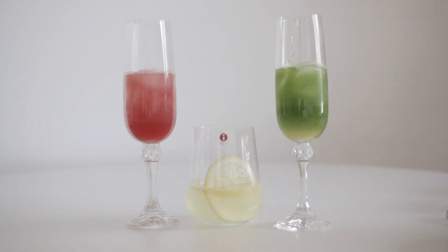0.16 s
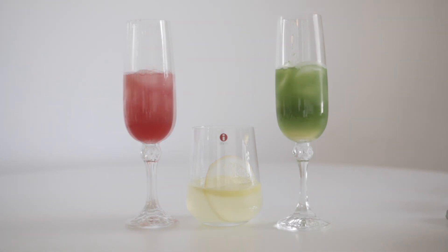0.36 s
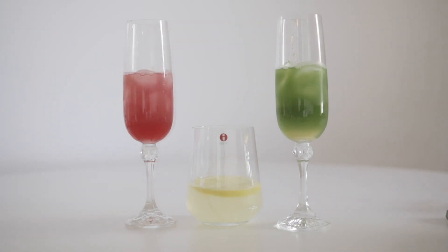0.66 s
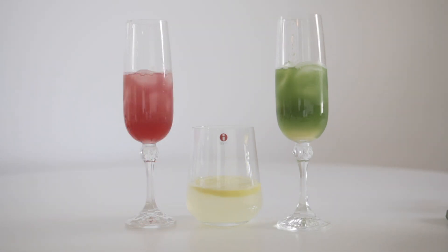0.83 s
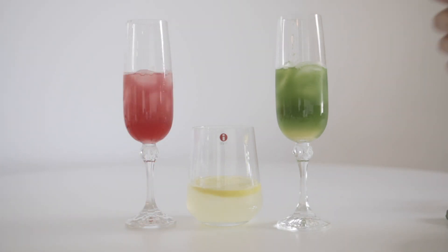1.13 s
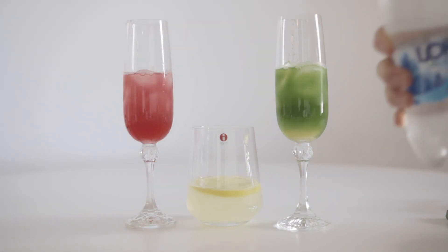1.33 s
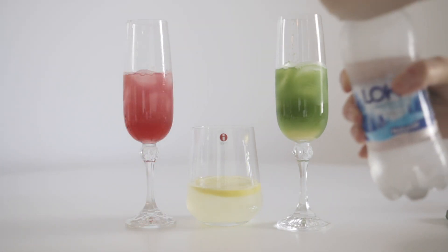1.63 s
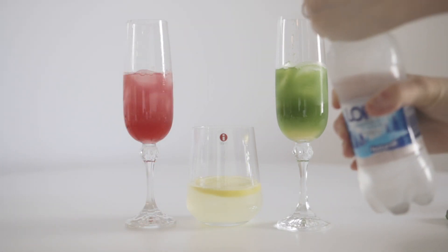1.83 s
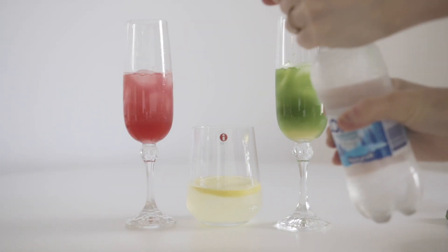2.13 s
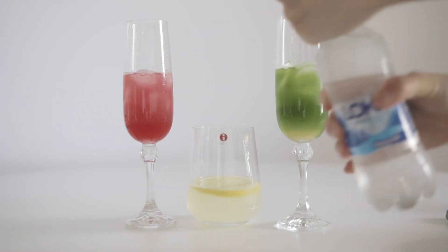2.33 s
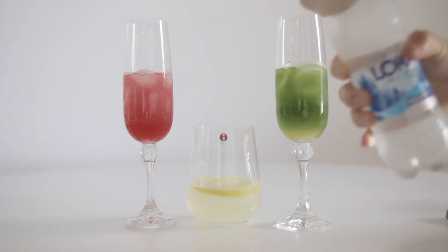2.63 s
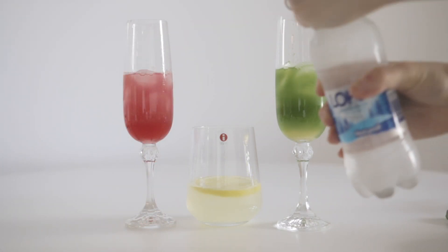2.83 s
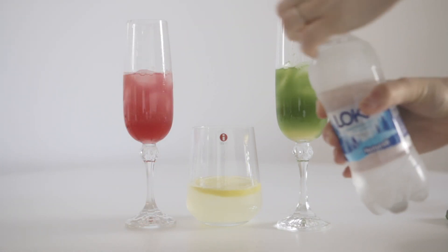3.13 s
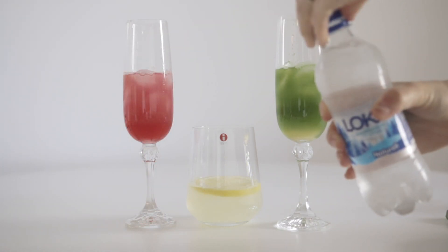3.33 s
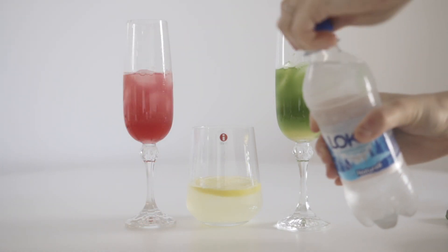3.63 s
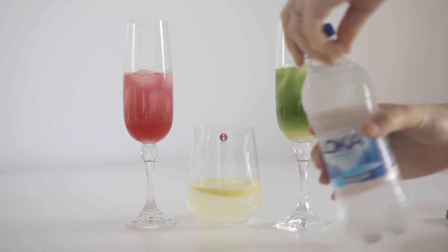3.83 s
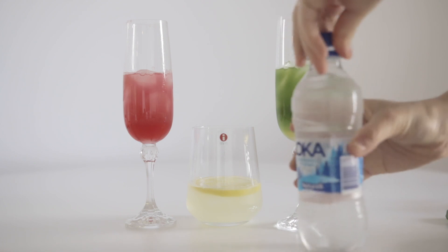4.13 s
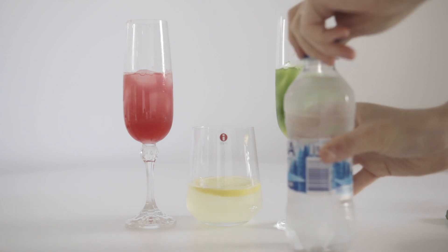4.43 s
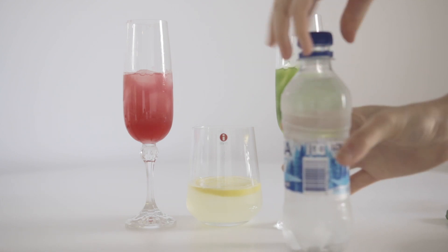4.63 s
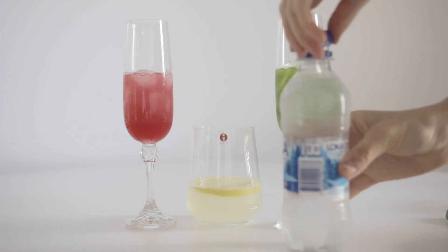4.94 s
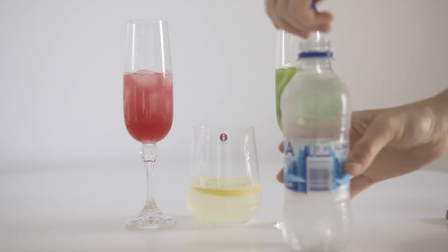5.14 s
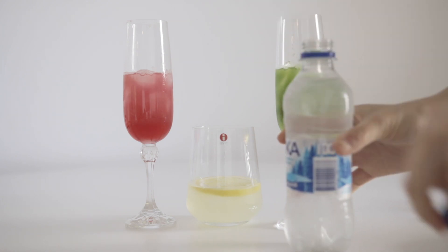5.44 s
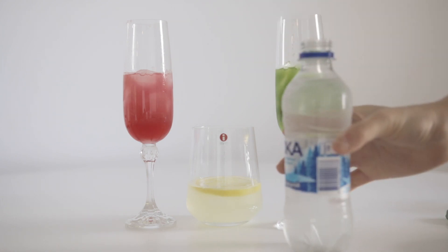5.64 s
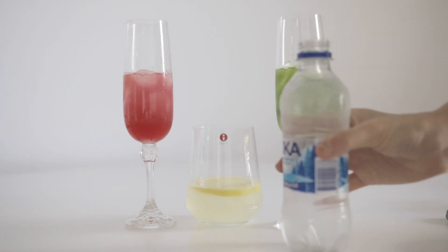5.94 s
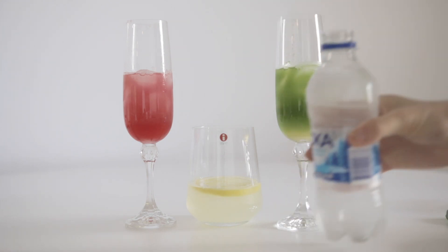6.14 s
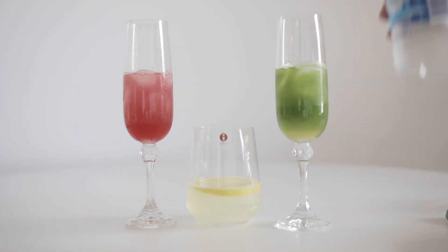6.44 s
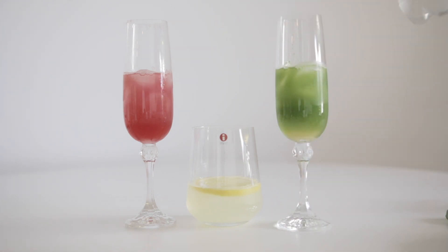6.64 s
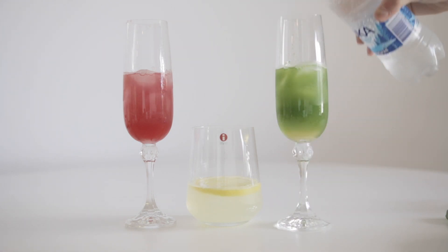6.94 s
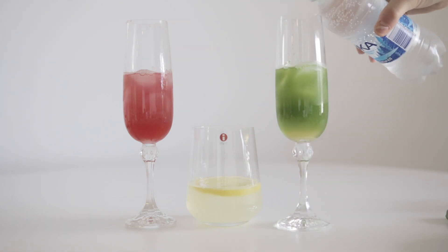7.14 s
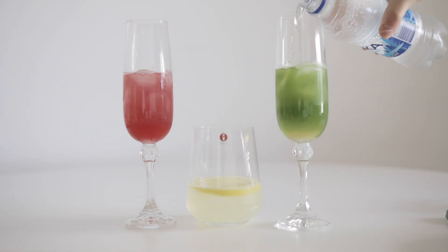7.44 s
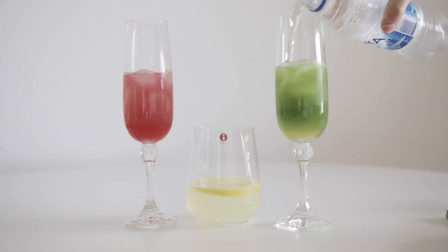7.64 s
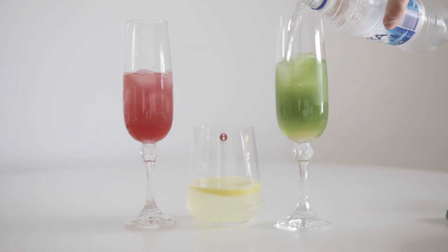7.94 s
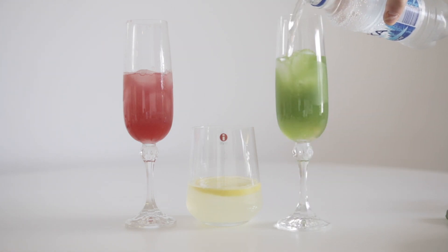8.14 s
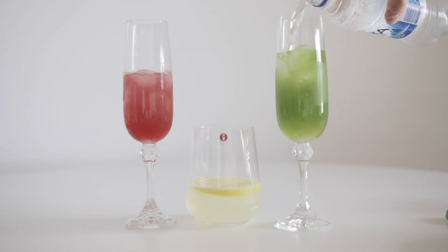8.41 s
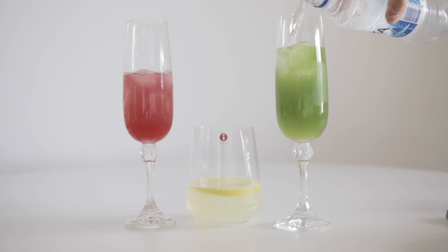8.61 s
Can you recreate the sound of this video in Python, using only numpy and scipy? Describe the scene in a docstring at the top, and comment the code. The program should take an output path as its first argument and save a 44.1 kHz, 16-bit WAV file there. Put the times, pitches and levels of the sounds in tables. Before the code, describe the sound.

In a quiet room, a faint glass tap is followed by soft rubbing and ticks of fingers on a plastic bottle. The cap cracks with a brief wisp of gas and small sloshes. The bottle lands on a table with a low thud, the cap snaps loudly and clicks loose, then drops and rattles to rest. Finally, fizzy water pours softly over clinking ice in a glass. Everything sounds close.

```python
"""A plastic bottle of fizzy water is handled in a quiet room and its cap cracked open: snaps ring cap and
hollow wall, the thread grinds, gas sings in the neck. Set down, the bottle makes the table boom in its
low modes; the dropped cap rattles to rest. Water is poured over ice in a tall glass: ice rings the glass,
bubbles excite a rising air column, fizz spits. At the start a lemon slice tips over in a tumbler."""
import sys
import numpy as np
from scipy import signal
from scipy.io import wavfile
from scipy.ndimage import uniform_filter1d

SR = 44100
rng = np.random.default_rng(int(sys.argv[2]) if len(sys.argv) > 2 else 0)


def digitize_waveform(pressure):
    """Quantize a signal to 16-bit integers and store it at the path in sys.argv[1].

    Rows of a 2-D input are taken as channels; values are limited to [-1, 1].
    """
    field = np.atleast_2d(pressure).T
    bounded = np.clip(field, -1, 1)
    quanta = np.round(bounded * 32767).astype(np.int16)
    wavfile.write(sys.argv[1], SR, quanta)


N = 386757

# Noise spectra. Each row: frequency in Hz, relative density in dB.
ROOM_SPECTRUM = [(25, -9.5), (91, -6), (462, -6.5), (2200, -20.5), (8000, -28), (15900, -33)]
RUB_SPECTRUM = [(1300, -16), (2600, -10.5), (4500, -11), (7000, -28), (16000, -35)]
# Stereo likeness of noise. Each row: frequency in Hz, left-right correlation.
COHERENCE = [(60, 0.081), (380, 0.27), (2380, 0.64), (15000, 0.037)]
# Hum band. Values: centre in Hz, width in Hz, level in dB at the start, level in dB from 1 s on.
HUM_BAND = (312, 53, -64, -65.5)
# Skin and sleeve strokes. Each row: start and end in seconds, level in dB, relative hiss in dB.
RUB_STROKES = [(0.355, 0.638, -63, -6), (1.161, 1.388, -61.5, -3.5), (1.454, 1.783, -62, 0),
               (1.629, 1.93, -56, 4.5), (3.827, 3.996, -59.5, 7)]
# Sudden slips. Each row: start in seconds, level in dB, t60 in seconds, resonance in Hz.
SLIP_STROKES = [(0.614, -43.5, 1, 2500), (2.363, -46.5, 0.79, 2620), (2.873, -35.5, 0.18, 4460),
                (4.385, -30, 0.32, 3200)]
# Contacts. Each row: start in seconds, peak in dB.
LEMON_TAPS = [(0.613, -34.5), (0.62, -37), (0.638, -37)]
FINGER_TICKS = [(1.917, -27), (2.029, -39), (2.124, -30.5), (2.2097, -37), (2.313, -44.5), (2.5282, -30),
                (3.8385, -27.5), (3.885, -36), (3.895, -20.5), (3.92, -26), (3.944, -32), (3.9936, -29.5),
                (4.937, -32), (5.466, -36.5), (4.818, -29), (4.835, -28), (4.865, -35)]
BOTTLE_LANDINGS = [(4.032, -18.5), (4.0834, -29.5), (4.177, -44)]
# Struck bodies. Each row: frequency in Hz, relative level in dB, t60 in seconds.
TUMBLER_MODES = [(2610, -1, 0.052), (3530, 1, 0.029), (4150, 11, 0.038)]
TIGHT_CAP_MODES = [(1880, -15.5, 0.0036), (2620, -1.5, 0.0038), (3150, 0, 0.0049), (3960, 7, 0.0019)]
BOTTLE_WALL_MODES = [(540, 2, 0.041), (793, 9.5, 0.027), (984, 3, 0.023)]
BOTTLE_BASE_MODES = [(455, 4.5, 0.041), (1390, -12.5, 0.023), (2350, -15, 0.011)]
LOOSE_CAP_MODES = [(3590, -13.5, 0.0038), (4700, -4.5, 0.0028), (6190, -9.5, 0.0041)]
TABLE_TOP_MODES = [(647, -18, 0.012), (1150, -6, 0.006), (1600, -3, 0.005), (2350, 2, 0.004)]
GLASS_MODES = [(1363, -11.5, 0.042), (2520, 8.5, 0.003), (3540, 1.5, 0.016), (4350, 4, 0.0087)]
# Liquid pulses. Each row: start in seconds, level in dB, pitch in Hz.
LIQUID_PLOPS = [(0.673, -43.5, 350), (2.39, -34, 520), (2.86, -28, 535), (3.179, -39.5, 590),
                (3.2405, -30.5, 587), (3.806, -34.5, 603), (3.852, -30, 511), (7.643, -30.5, 524)]
WATER_GULPS = [(7.654, -33.5, 1430), (8.0506, -35, 4100), (8.217, -28.5, 1920), (8.4465, -42.5, 1440),
               (8.582, -40.5, 1920)]
# Cap and wall snaps. Each row: start in seconds, cap peak in dB, relative tick peak in dB.
BOTTLE_SNAPS = [(1.859, -35, 3), (2.375, -45, 5), (2.829, -36.5, 1), (2.842, -26.5, 8.5),
                (2.8499, -16, -11), (2.8573, -7.5, -2.5), (3.0765, -25, 7), (3.098, -22, 8.5),
                (3.54, -41, -5), (3.61, -44, 3), (3.8507, -32, -12), (3.9403, -24, 11), (4.268, -39, -1),
                (4.374, -1, 1.5), (4.377, -11.5, -9), (4.6571, -36, 7), (4.784, -11.5, -13),
                (4.83, -22, -14), (4.846, -26, -3), (4.9467, -26, -7), (4.987, -24, 7.5),
                (5.111, -25, -7.5), (5.3345, -37.5, 0)]
# Escaping gas. Values: start in seconds, level in dB, centre in Hz, width in Hz, t60 in seconds.
GAS_BURST = (2.862, -41, 2320, 130, .5)
# Turns of the cap. Each row: start and end in seconds, level in dB.
CAP_TWISTS = [(3.17, 3.211, -60), (3.5, 3.83, -65), (4.26, 4.367, -61.5)]
# Pushes on the table. Each row: start in seconds, rocking gain in dB, bending gain in dB.
TABLE_PUSHES = [(4.033, -15.5, -20.5), (4.363, -18, -29), (4.838, -24.5, -24), (5.218, -41, -32.5),
                (5.329, -39, -48), (5.631, -49, -35.5), (5.743, -40.5, -51.5), (6.102, -37.5, -48),
                (7.607, -51, -70)]
# Low table modes. Each row: frequency in Hz, relative level in dB, t60 in seconds, right lag in cycles.
ROCKING_MODES = [(72.8, 0, 0.74, 0.09), (84.3, 3, 0.54, 0.089)]
BENDING_MODES = [(38.2, -7, 1, 0.4), (117.7, 10, 0.24, 0.16), (131.5, -6, 1, 0.18),
                 (193.8, -5.5, 0.59, 0.17)]
# Cap bounces. Each row: start in seconds, cap peak in dB, flatness from 0 (rim) to 1 (flat).
CAP_BOUNCES = [(5.695, -40.5, 0.71), (5.7214, -3, 0.034), (5.727, -19, 0.45), (5.747, -21.5, 0.78),
               (5.7602, -4, 0.03), (5.778, -11.5, 0.039), (5.791, -11.5, .02), (5.8, -26.5, 0.91),
               (5.8146, -4, 0.063), (5.8292, -13, 0.12), (5.8357, -20.5, 0.57), (5.855, -26.5, 0.6)]
# Ice on glass. Each row: start in seconds, ring peak in dB, mode tilt in dB per octave.
ICE_KNOCKS = [(7.601, -39, 7), (7.6176, -24, 34), (7.6714, -23.5, -3), (7.6988, -28.5, 2),
              (7.8337, -30.5, -20.5), (7.871, -27, -22.5), (8.2018, -34, -7.5)]
# Stream envelope. Each row: time in seconds, gain in dB.
STREAM_FLOW = [(7.612, -50.5), (7.78, -58.5), (7.86, -51.5), (7.96, -58), (8.77, -61)]
# Room decay before treble absorption. Each row: frequency in Hz, t60 in seconds.
ROOM_DECAY = [(250, 0.98), (700, 0.6), (2000, 0.57), (11000, 0.44)]


def gain(db):
    return 10 ** (np.asarray(db) / 20)


def decay(t, t60_s, db=0):
    return gain(db - 60 * t / t60_s)


def unit_rms(x):
    return x / np.sqrt(np.mean(x ** 2) + 1e-20)


def log_interp(points, hz):
    knots_hz, values = np.transpose(points)
    return np.interp(np.log(hz + 1), np.log(knots_hz + 1), values)


def highpass(x, hz):
    return signal.sosfilt(signal.butter(4, hz, "high", fs=SR, output="sos"), x)


def add(mix, start_s, sound, left_db=0):
    """Mix in, panned; channels up to one sample apart."""
    for channel, side, lag in zip(mix, (1, -1), rng.integers(0, 2, 2)):
        part = channel[round(start_s * SR) + lag:][:len(sound)]
        part += sound[:len(part)] * gain(side * left_db / 2)


def ring(modes):
    """Damped sines, peak 1."""
    t = np.arange(4000) / SR
    x = sum(decay(t, t60_s, db) * np.sin(2 * np.pi * hz * t) for hz, db, t60_s in modes)
    return x / abs(x).max()


def detuned(modes):
    """The grip changes per blow and shifts each mode."""
    return [(hz * rng.uniform(.96, 1.04), db + rng.uniform(-3, 3), t60_s) for hz, db, t60_s in modes]


def tick(cutoff_hz):
    """Bare treble of a hard contact."""
    return highpass(np.arange(4000) == 0, cutoff_hz)


def struck(parts, tail_ms):
    """An impulse with a rough tail drives each (response, peak dB) part."""
    t = np.arange(1500) / SR
    contact = (t == 0) + .22 * rng.standard_normal(len(t)) * np.exp(-1000 * t / tail_ms)
    sounds = [(signal.fftconvolve(contact, response)[:4000], db) for response, db in parts]
    return sum(gain(db) * x / abs(x).max() for x, db in sounds)


def band_noise(count, hz, width_hz):
    return unit_rms(signal.lfilter(*signal.iirpeak(hz, hz / width_hz, SR), rng.standard_normal(count)))


def stereo_noise(field_db):
    """Partly coherent noise, rms 1, shaped by a bins x frames field."""
    bins, frames = field_db.shape
    a, b, c, d = rng.standard_normal((frames, bins, 4)).T
    coherence = log_interp(COHERENCE, np.linspace(0, SR / 2, bins))[:, None]
    left = a + 1j * b
    right = coherence * left + np.sqrt(1 - coherence ** 2) * (c + 1j * d)
    size = 2 * bins - 1
    _, x = signal.istft(np.array([left, right]) * gain(field_db), nperseg=size, noverlap=size * 3 // 4)
    return unit_rms(x[:, :N])


def room_air(level_db=-57.5):
    """Steady hush with faint drifting patches."""
    patches = rng.standard_normal((N // 512 + 5, 1025)).T
    drift_db = 1.1 * unit_rms(uniform_filter1d(uniform_filter1d(patches, 10, 0), 12, 1))
    spectrum_db = log_interp(ROOM_SPECTRUM, np.fft.rfftfreq(2048, 1 / SR))
    return gain(level_db) * stereo_noise(spectrum_db[:, None] + drift_db)


def hum():
    """Faint wavering hum: noise in one low resonance."""
    hz, width_hz, first_db, later_db = HUM_BAND
    return band_noise(N, hz, width_hz) * gain(np.interp(np.arange(N) / SR, [0, 1], [first_db, later_db]))


def friction(count, hollow_hz, hiss_db):
    """Grainy noise with a hollow resonance and hiss on top."""
    hz = np.fft.rfftfreq(256, 1 / SR)[:, None]
    grain_db = 1.9 * unit_rms(uniform_filter1d(rng.exponential(1, SR // 100), 3) - 1)
    colour_db = log_interp(RUB_SPECTRUM, hz) + 7 * np.exp(-((hz / hollow_hz - 1) / .1) ** 2)
    hiss = unit_rms(highpass(stereo_noise(np.zeros_like(hz) + grain_db), 6000))
    return (stereo_noise(colour_db + grain_db) + gain(hiss_db) * hiss)[:, :count]


def rubs(swell_share=.31, ease_share=.16, hollow_hz=4100):
    """Skin and sleeves rub: swell, hold, ease off."""
    out = np.zeros((2, N))
    for start_s, end_s, db, hiss_db in RUB_STROKES:
        count = round((end_s - start_s) * SR)
        progress = np.arange(count) / SR / (end_s - start_s)
        envelope = np.minimum(progress / swell_share, 1) * np.minimum((1 - progress) / ease_share, 1)
        sound = gain(db) * envelope * friction(count, hollow_hz, hiss_db)
        out[:, round(start_s * SR):][:, :count] += sound
    return out


def lemon_taps():
    """The tipping slice rings the half-full tumbler."""
    out = np.zeros((2, N))
    for start_s, db in LEMON_TAPS:
        add(out, start_s, struck([(ring(detuned(TUMBLER_MODES)), db)], tail_ms=.68))
    return out


def slips(rise_s=.015):
    """Lemon slips down the tumbler, cap on its thread: sudden, fading friction."""
    out, t = np.zeros((2, N)), np.arange(SR // 2) / SR
    for start_s, db, t60_s, hollow_hz in SLIP_STROKES:
        envelope = np.minimum(t / rise_s, 1) * decay(t, t60_s, db)
        out[:, round(start_s * SR):][:, :len(t)] += envelope * friction(len(t), hollow_hz, hiss_db=-7)
    return out


def plops(rise_s=.0006, t60_s=.032):
    """Liquid plops in tumbler and tilted bottle: short damped sines."""
    out, t = np.zeros((2, N)), np.arange(2000) / SR
    for start_s, db, hz in LIQUID_PLOPS:
        envelope = (1 - np.exp(-t / rise_s)) * decay(t, t60_s, db)
        add(out, start_s, envelope * np.sin(2 * np.pi * hz * t), left_db=.6)
    return out


def snaps(upright_s=3.93, held_db=-23, free_db=-8.5):
    """Snaps tick and ring cap and hollow wall; hands damp the wall until the bottle is upright."""
    out = np.zeros((2, N))
    for start_s, db, tick_db in BOTTLE_SNAPS:
        wall_db, tick_hz = (free_db, 7000) if start_s > upright_s else (held_db, 4000)
        cap = highpass(ring(detuned(TIGHT_CAP_MODES)), 900)
        wall = highpass(ring(detuned(BOTTLE_WALL_MODES)), 400)
        body = struck([(cap, db), (wall, db + wall_db)], tail_ms=.12)
        crack = struck([(tick(tick_hz), db + tick_db)], tail_ms=1.56)
        add(out, start_s, body + crack, left_db=.6)
    return out


def finger_ticks():
    """Thin plastic ticks under the fingers."""
    out = np.zeros((2, N))
    for start_s, db in FINGER_TICKS:
        add(out, start_s, struck([(tick(2800), db)], tail_ms=.33))
    return out


def gas():
    """The seal breaks; gas sings in a narrow neck resonance."""
    start_s, db, hz, width_hz, t60_s = GAS_BURST
    out, t = np.zeros((2, N)), np.arange(SR // 2) / SR
    add(out, start_s, band_noise(len(t), hz, width_hz) * decay(t, t60_s, db))
    return out


def thread_grind(slips_per_s=350):
    """Clumped slips of the thread tick the cap."""
    out, cap = np.zeros((2, N)), highpass(ring(TIGHT_CAP_MODES), 2300)
    for start_s, end_s, db in CAP_TWISTS:
        count = round((end_s - start_s) * SR)
        clump_db = 3 * unit_rms(uniform_filter1d(rng.standard_normal(count), 600))
        onsets = rng.random(count) < slips_per_s / SR
        size_db = 4 * np.minimum(rng.exponential(1, count), 3)
        pulses = onsets * gain(size_db + clump_db) * rng.choice([-1, 1], count)
        add(out, start_s, gain(db) * unit_rms(signal.oaconvolve(pulses, cap)[:count]))
    return out


def bottle_landings():
    """The full bottle meets the table; its broad base rounds off the blow."""
    out, soft_tick = np.zeros((2, N)), np.convolve(tick(740), np.hanning(9))
    for start_s, db in BOTTLE_LANDINGS:
        add(out, start_s, struck([(ring(BOTTLE_BASE_MODES), db), (soft_tick, db - 18)], tail_ms=3.1))
    return out


def table_boom():
    """Pushes rock and bend the table; each mode reaches the right microphone a fraction of a cycle later."""
    out, t = np.zeros((2, N)), np.arange(SR) / SR

    def swings(modes):
        return [decay(t, t60_s, db) * np.sin(2 * np.pi * (hz * t - np.array([[0], [lag]])))
                for hz, db, t60_s, lag in modes]

    lower, upper = swings(ROCKING_MODES)
    rocking = lower - upper  # close pair: starts opposed, beats
    bending = sum(swings(BENDING_MODES))
    for start_s, rock_db, bend_db in TABLE_PUSHES:
        rise_ms = np.interp(max(rock_db, bend_db), [-34, -18], [28, 3])  # gentle pushes build slowly
        chatter = 1 + .5 * unit_rms(uniform_filter1d(rng.standard_normal(SR), 900))  # things on it shake
        swing = gain(rock_db) * rocking + gain(bend_db) * bending * chatter
        out[:, round(start_s * SR):][:, :SR] += swing * (1 - np.exp(-1000 * t / rise_ms)) ** 2
    return out


def cap_rattle():
    """The soft plastic cap bounces; flat landings knock the table top harder than rim landings."""
    out = np.zeros((2, N))
    for start_s, db, flatness in CAP_BOUNCES:
        cap = np.convolve(highpass(ring(detuned(LOOSE_CAP_MODES)), 1500), np.hanning(8))
        top = highpass(ring(detuned(TABLE_TOP_MODES)), 280)
        knock_db = db + np.interp(flatness, [0, 1], [-16.5, 9])
        tick_db = db + np.interp(flatness, [0, 1], [-24.5, 10.5])
        clack = struck([(cap, db)], tail_ms=.035)
        knock = struck([(top, knock_db), (tick(7200), tick_db)], tail_ms=4.45)
        add(out, start_s, clack + knock, left_db=-2.5)
    return out


def ice(splash_db=-13):
    """Ice rings the glass, each knock with a bright splash."""
    out, splash = np.zeros((2, N)), np.convolve(tick(1900), np.hanning(6))
    for start_s, db, tilt_db in ICE_KNOCKS:
        glass = ring([(hz, mode_db + tilt_db * np.log2(hz), t60_s)
                      for hz, mode_db, t60_s in detuned(GLASS_MODES)])
        add(out, start_s, struck([(glass, db), (splash, db + splash_db)], tail_ms=.33), left_db=1.5)
    return out


def air_column(t, pops, empty_hz=1290, rise_per_s2=.44, width_hz=110, fade_db_per_s=19.5):
    """Pops excite the air in the filling glass; the column shortens ever faster and weakens."""
    hz = empty_hz * (1 + rise_per_s2 * t ** 2)
    carrier = np.exp(2j * np.pi * np.cumsum(hz) / SR)
    pole = np.exp(-np.pi * width_hz / SR)
    churn = unit_rms(pops) + .37 * rng.standard_normal(len(t))
    resonance = (carrier * signal.lfilter([1], [1, -pole], churn / carrier)).real
    return unit_rms(resonance) * gain(-fade_db_per_s * t)


def bubbles(pops, sizes=24):
    """Each bubble chirps upward as it nears the surface."""
    out, t = np.zeros(len(pops)), np.arange(600) / SR
    size = rng.integers(0, sizes, len(pops))
    for k, hz in enumerate(np.geomspace(1000, 4600, sizes)):
        chirp = np.sin(2 * np.pi * hz * t * (1 + 9.1 * t)) * np.exp(-t * hz / 1.1)
        out += signal.oaconvolve(pops * (size == k), chirp)[:len(pops)]
    return unit_rms(out)


def fizz(count, ticks_per_s=500, colours=8):
    """Bursting gas bubbles spit fine ticks, mostly small."""
    onsets = rng.random(count) < ticks_per_s / SR
    pulses = onsets * gain(3 * np.minimum(rng.exponential(1, count), 3))
    colour = rng.integers(0, colours, count)
    bursts = [struck([(tick(5000 + 1250 * k), 0)], tail_ms=.3) for k in range(colours)]
    return sum(signal.oaconvolve(pulses * (colour == k), x)[:count] for k, x in enumerate(bursts))


def stream(pops_per_s=260, fizz_db=-59):
    """Poured water: random pops drive air column and bubbles, over steady fizz."""
    times_s, flow_db = np.transpose(STREAM_FLOW)
    out, t = np.zeros((2, N)), np.arange(times_s[0], times_s[-1], 1 / SR)
    size_db = 4 * np.minimum(rng.exponential(1, len(t)), 4)
    onsets = rng.random(len(t)) < pops_per_s / SR
    pops = onsets * gain(size_db) * rng.choice([-1, 1], len(t))
    water = air_column(t - t[0], pops) + .43 * bubbles(pops)
    flow = gain(np.interp(t, times_s, flow_db))
    add(out, t[0], flow * water + gain(fizz_db) * fizz(len(t)), left_db=1.5)
    return out


def gulps(t60_s=.008):
    """Water gulps between the ice, ringing briefly."""
    out = np.zeros((2, N))
    for start_s, db, hz in WATER_GULPS:
        add(out, start_s, struck([(ring([(hz, 0, t60_s)]), db)], tail_ms=2.7), left_db=1.5)
    return out


def room_response(scatter_db=-5, tail_db=-9.5, absorb_hz_per_db=1500):
    """Sparse reflections: quick scatter off table and glasses, then a tail; walls absorb treble."""
    count = SR // 2
    taps = np.zeros((2, count))
    at = np.arange(30, count - 20, 20) + rng.integers(0, 20, (2, (count - 31) // 20))
    np.put_along_axis(taps, at, rng.choice([-1., 1.], at.shape), 1)
    taps[1] = .76 * taps[0] + .61 * taps[1]
    scatter = uniform_filter1d(taps, size=3) * decay(np.arange(count) / SR, t60_s=.029)
    hz, t, spectra = signal.stft(taps, SR, nperseg=256)
    spectra *= decay(t, log_interp(ROOM_DECAY, hz)[:, None], -hz[:, None] / absorb_hz_per_db)
    tail = signal.istft(spectra, SR, nperseg=256)[1][:, :count]
    return sum(gain(db) * x / np.linalg.norm(x[0]) for x, db in [(scatter, scatter_db), (tail, tail_db)])


def reverb(x, responses=5, crossfades_per_s=37):
    """Room reverb, crossfading through several random responses so successive clicks differ in colour."""
    out, position = np.zeros((2, N)), np.arange(N) / SR * crossfades_per_s
    for k in range(responses):
        distance = abs((position - k + responses / 2) % responses - responses / 2)
        weight = np.sqrt(np.clip(1 - distance, 0, 1))
        out += signal.fftconvolve(x * weight, room_response(), axes=1)[:, :N]
    return out


def scene():
    """Near sounds with reverb; table boom, friction and background without."""
    near = lemon_taps() + plops() + snaps() + finger_ticks() + gas() + thread_grind()
    near += bottle_landings() + cap_rattle()
    near += highpass(ice() + stream() + gulps(), 350)  # a small glass radiates no bass
    return near + reverb(near) + table_boom() + rubs() + slips() + room_air() + hum()


def record(dry):
    """Bright microphone, soft-clipping input stage, band limit."""
    presence_hz, presence_db, edge_hz = 11000, -8.5, 16250
    treble_fir = signal.firwin(31, presence_hz, pass_zero=False, fs=SR)
    edge_fir = signal.firwin(511, edge_hz, window=("kaiser", 9), fs=SR)
    bright = dry + gain(presence_db) * signal.oaconvolve(dry, treble_fir[None], "same")
    return signal.oaconvolve(np.tanh(bright), edge_fir[None], "same")


dry = scene()
out = record(dry)
digitize_waveform(out)
```